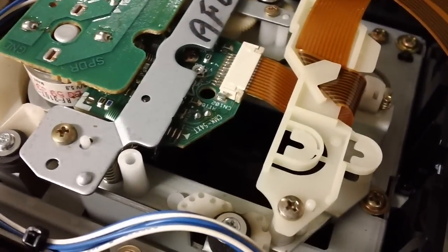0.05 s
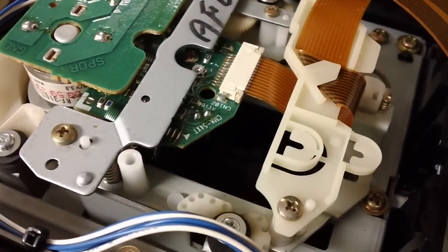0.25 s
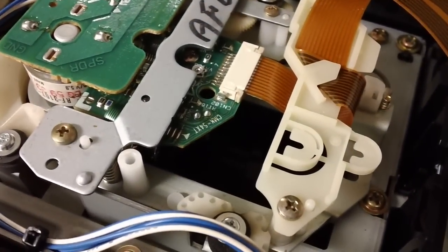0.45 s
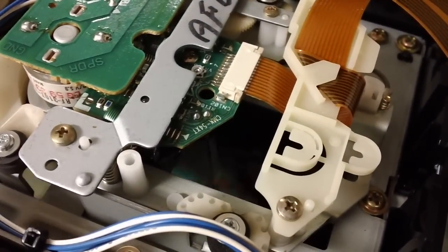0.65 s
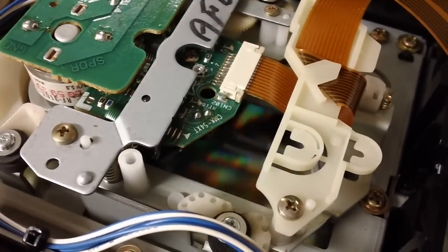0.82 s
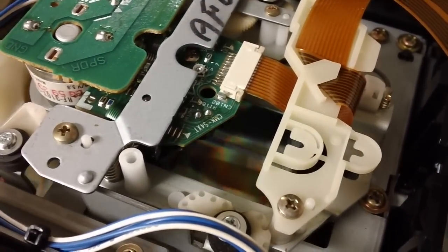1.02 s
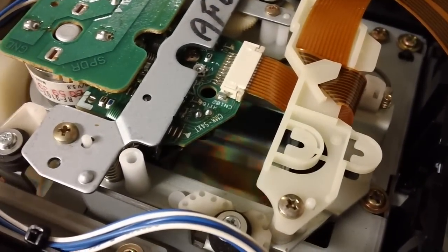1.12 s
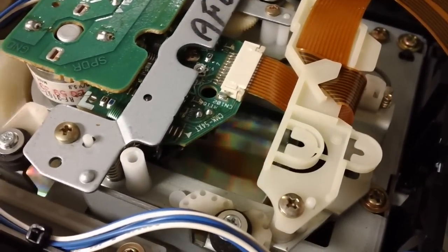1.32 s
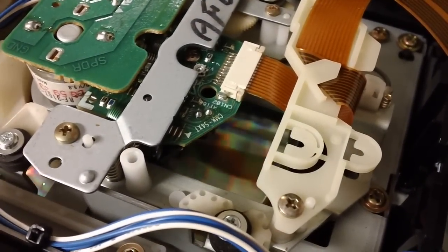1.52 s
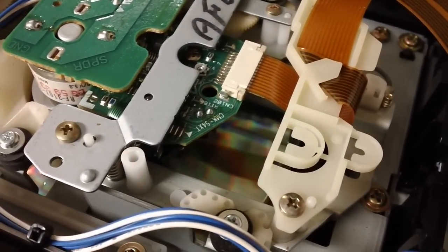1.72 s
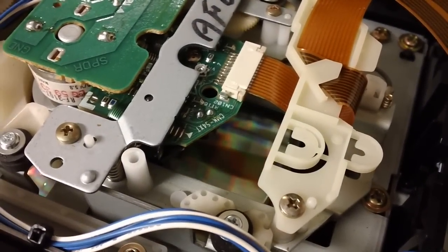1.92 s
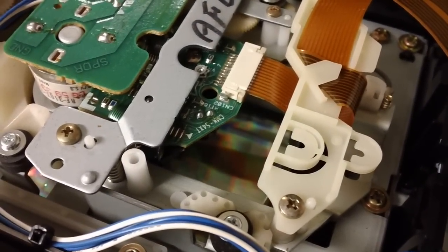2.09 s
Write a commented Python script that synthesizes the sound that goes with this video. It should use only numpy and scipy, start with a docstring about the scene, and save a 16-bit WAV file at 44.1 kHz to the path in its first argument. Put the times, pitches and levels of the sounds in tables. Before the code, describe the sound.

A disc changer mechanism clacks and rattles in two quick bursts of plastic levers and latches while a small geared motor whirs. The motor stops and a last latch snaps, heard close up in a quiet room.

```python
"""A disc changer's plastic cams, levers and latches clack and bounce, close by in a quiet room.
Each contact is a sharp blow and a dying chatter that ring the chassis, the levers and metal parts.
A small motor drives them: its brushes tick six times a turn in the treble, its gears rumble in the
chassis. The motor stops, a last latch snaps, and low room noise with a few dull bumps remains."""
import sys
import numpy as np
from scipy import signal
from scipy.fft import rfft, irfft
from scipy.io import wavfile
from scipy.ndimage import uniform_filter1d

SR = 44100
rng = np.random.default_rng(int(sys.argv[2]) if len(sys.argv) > 2 else 0)


def wav_out(sig):
    """Save sig, one row per channel (or a flat mono array), as 16-bit PCM at SR to the path in sys.argv[1]."""
    wavfile.write(sys.argv[1], SR, np.round(np.clip(np.atleast_2d(sig).T, -1, 1) * 32767).astype(np.int16))


N = 94815


def undb(db):
    return 10 ** (np.asarray(db) / 20)


def unit(x):
    return x / np.sqrt(np.mean(x ** 2))


def ring(x, modes):
    """Parallel resonances (pitch_hz, width_hz, level_db) that keep the power of white noise."""
    def bank(drive):
        return sum((-1) ** k * undb(db) * signal.lfilter(*signal.iirpeak(hz, hz / width, fs=SR), drive)
                   for k, (hz, width, db) in enumerate(modes))
    impulse = np.arange(1024) == 0
    return bank(x) / np.sqrt(np.sum(bank(impulse) ** 2))


def coloured(spectrum):
    """Noise of unit power, shaped by a spectrum (pitch_hz, level_db)."""
    hz, db = np.array(spectrum).T
    bins_hz = np.arange(N // 2 + 1) * SR / N + 1
    gain = undb(np.interp(np.log(bins_hz), np.log(hz), db))
    return unit(irfft(rfft(rng.standard_normal(N)) * gain, N))


def flicker(rate_hz):
    """Glides between random values, with a spread of 1."""
    hold = int(SR / rate_hz)
    steps = np.repeat(rng.standard_normal(N // hold + 1), hold)
    return unit(uniform_filter1d(steps, hold)[:N])


def curve(points, column):
    """One column as an envelope over the times in the first."""
    points = np.array(points)
    return np.interp(np.arange(N) / SR, points[:, 0], points[:, column])


def room():
    """Low room tone that swells towards the end, with a few dull bumps."""
    # room tone spectrum: pitch_hz, level_db
    spectrum = [(15, -38.5), (25, -16.5), (114, -4), (236, -1), (293, -3), (503, -7.5), (545, -6),
                (962, -10), (1070, -12.5), (14800, -30), (16000, -39.5)]
    # dull bumps: start_s, pitch_hz, length_s, level_db
    bumps = [(0.31, 165, 0.056, -41.5), (1.341, 88, 0.027, -39), (1.932, 290, 0.028, -48.5),
             (1.993, 215, .03, -49), (2.06, 298, .045, -42.5)]
    t = np.arange(N) / SR
    thuds = sum(undb(db) * np.sin(2 * np.pi * hz * t) * np.sin(np.pi * np.clip((t - s) / length, 0, 1))
                for s, hz, length, db in bumps)
    swell_db = 8.5 * np.maximum(t - 1.72, 0)
    return coloured(spectrum) * undb(-54 + swell_db) + thuds


def gears():
    """Gears grind into the chassis: a ringing rumble whose level flickers by about 1 dB."""
    # rumble spectrum: pitch_hz, level_db
    spectrum = [(59, -32), (100, -5.5), (323, -0.5), (393, -9), (504, -3), (815, -6), (1390, -11),
                (1520, -7.5), (2090, -11), (2880, -12), (7000, -23.5), (9100, -35.5), (15400, -120)]
    # gear resonances: pitch_hz, width_hz, level_db
    modes = [(738, 154, -6.5), (1412, 13, -7), (2330, 47, -9.5), (3597, 130, -9)]
    rumble = coloured(spectrum) + undb(-4.5) * ring(rng.standard_normal(N), modes)
    return unit(rumble * undb(flicker(rate_hz=61.31)))


def brushes():
    """Brushes tick and scrape over each commutator segment and rub steadily; the bearing hisses."""
    # shaft rotation: time_s, turns
    shaft = [(0, -.4), (.0593, 2), (.1058, 4), (.308, 13), (.403, 17), (.587, 24), (.7337, 30), (.8559, 35),
             (.9757, 40), (1.0939, 45), (1.2089, 50), (1.5301, 64)]
    # tick of each segment: level_db
    segment_db = [0, -11, -5, -7.5, -11, -8]
    # resonances of tick, rub and bearing: pitch_hz, width_hz, level_db
    tick_modes = [(8650, 700, -1), (9820, 650, 0), (10700, 650, 0), (11900, 1000, -6), (14900, 900, -7)]
    rub_modes = [(7350, 350, 0), (7800, 250, 0), (8650, 500, 0), (9780, 400, 0), (10700, 400, 0),
                 (11500, 800, -11)]
    bearing_modes = [(13500, 1200, -1), (15100, 900, -1.5)]
    segment = np.floor(curve(shaft, 1) * len(segment_db)).astype(int)
    edges = np.flatnonzero(np.diff(segment)) + 1
    scatter_db = rng.standard_normal(N)[edges]
    ticks = np.zeros(N)
    ticks[edges] = undb(np.array(segment_db)[segment[edges] % len(segment_db)] + scatter_db)
    scrape = signal.lfilter([1], [1, -.95], ticks) * rng.standard_normal(N)
    contact = unit(ticks) + undb(-8) * unit(scrape)
    ticking = unit(ring(ring(contact, tick_modes), tick_modes))
    rub = ring(rng.standard_normal(N), rub_modes)
    hiss = ring(rng.standard_normal(N), bearing_modes)
    return unit(ticking + rub) + undb(-15) * hiss


def motor(stop_s=1.527, brush_t60_s=0.088, gear_t60_s=0.23):
    """Brushes and gears follow the load, then die away when the current stops."""
    # levels under load: time_s, brushes_db, gears_db
    load = [(0.0, -45.5, -42.5), (0.126, -36.5, -42.5), (0.282, -38.5, -40.5), (0.402, -44.5, -42),
            (0.524, -49.5, -42), (0.8, -46.5, -48.5), (0.952, -43.5, -46), (1.058, -42.5, -43),
            (1.248, -41, -45.5), (1.404, -49.5, -48.5), (1.442, -49.5, -54.5), (1.52, -48.5, -50.5)]
    stopped_s = np.maximum(np.arange(N) / SR - stop_s, 0)
    brush_gain = undb(curve(load, 1) - 60 * stopped_s / brush_t60_s)
    gear_gain = undb(curve(load, 2) - 60 * stopped_s / gear_t60_s)
    return brushes() * brush_gain + gears() * gear_gain


def clacks(rise_s=0.00014, chatter_db=5, ping_trim_db=-21, ping_t60_share=0.45):
    """Each contact is a blow and a dying chatter: it rings four parts and one ping of its own."""
    # cam and latch contacts: start_s, ping_db (before trim), ping_hz, chassis_db, chassis_hz,
    # low_lever_db, high_lever_db, metal_db, base_t60_s
    contacts = [(0.023, -13.5, 1720, -38, 730, -45, -48, -70, 0.055),
                (0.092, -9.5, 1700, -47, 673, -48, -47, -45, 0.023),
                (0.1365, 2, 6390, -63, 692, -66, -52, -35, 0.011),
                (0.184, -28, 3800, -37, 720, -41, -38, -60, 0.1),
                (0.22, -2, 2260, -30, 1146, -49, -52, -57, 0.03),
                (0.2256, 11.5, 3830, -36.5, 550, -28, -27, -31, 0.029),
                (0.234, -0.5, 3290, -29.5, 740, -27.5, -30, -42, 0.07),
                (0.239, -1, 2200, -66, 686, -40.5, -53, -39, 0.027),
                (0.269, 4.5, 6290, -41, 730, -35, -35, -27, 0.038),
                (0.312, -12, 4350, -34, 755, -31, -36, -32, 0.093),
                (0.374, -22, 2500, -47, 899, -46, -62, -47.5, 0.037),
                (0.4097, 2, 2580, -25.5, 820, -24, -28, -31.5, 0.029),
                (0.413, 7, 1840, -21, 850, -32.5, -45, -53, 0.051),
                (0.445, -3.5, 1950, -26, 850, -34, -53, -56, 0.085),
                (0.465, 16.5, 2146, -16.5, 890, -17.5, -17.5, -19.5, 0.043),
                (0.48, -5, 2870, -23.5, 590, -44, -32.5, -31.5, 0.13),
                (0.487, -3, 2600, -24, 840, -35, -47, -46, 0.14),
                (0.495, -11, 1960, -23.5, 1090, -23.5, -27.5, -28, 0.07),
                (0.498, -6, 4230, -38, 700, -30, -24, -21, 0.043),
                (0.503, 3, 2290, -22.5, 695, -39, -32, -31.5, 0.1),
                (0.53, -7, 2350, -38, 638, -33, -32, -33.5, 0.076),
                (0.554, 0, 4660, -38, 694, -28.5, -31, -26, 0.048),
                (0.57, 1, 2330, -20, 887, -24, -25.5, -31.5, 0.078),
                (0.588, -2, 2040, -28.5, 778, -63, -63, -48, 0.075),
                (0.685, -29, 2750, -35, 810, -44, -44, -43.5, 0.23),
                (0.719, -31, 1950, -44, 503, -42.5, -48, -46, 0.088),
                (0.764, -29, 2070, -37.5, 800, -54, -48, -44.5, 0.42),
                (0.865, -21, 2880, -39.5, 730, -42, -46.5, -51, 0.12),
                (0.885, -25, 1620, -33.5, 860, -47, -45.5, -58, 0.064),
                (0.9, -18, 1550, -52, 950, -47, -52, -48, 0.066),
                (0.95, -26, 2250, -45, 522, -49, -64, -50, 0.041),
                (1.015, -5, 5790, -58, 710, -43, -43, -43, 0.035),
                (1.029, -14.5, 3500, -41.5, 715, -48, -45.5, -55, 0.077),
                (1.066, -36, 1870, -42, 770, -48, -54, -53.5, 0.071),
                (1.079, -31, 2190, -42.5, 926, -46, -49.5, -52, 0.15),
                (1.115, -15.5, 2330, -44.5, 660, -48.5, -48, -55.5, 0.083),
                (1.147, -34.5, 2260, -45.5, 640, -45, -48, -53.5, 0.053),
                (1.154, -8, 2270, -41.5, 980, -32.5, -40, -45, 0.078),
                (1.161, -10.5, 2040, -35, 626, -35.5, -36.5, -40.5, 0.072),
                (1.239, -2, 5940, -27.5, 1120, -20.5, -20.5, -26.5, 0.12),
                (1.244, 6.5, 5150, -29, 640, -42.5, -18.5, -15.5, 0.082),
                (1.252, 7, 1220, -18.5, 770, -33.5, -40, -37, 0.013),
                (1.26, 7, 1240, -15.5, 900, -31, -29, -46.5, 0.041),
                (1.267, 4.5, 2070, -16, 730, -31.5, -33, -32.5, 0.029),
                (1.299, -22, 2270, -48, 813, -34, -40, -45, 0.048),
                (1.317, -3, 1930, -59, 697, -42, -34, -43, 0.055),
                (1.326, 12, 1760, -17.5, 800, -19.5, -24, -31.5, 0.044),
                (1.335, 4, 1660, -32.5, 880, -26.5, -22, -31.5, 0.062),
                (1.343, 2, 2560, -16.5, 740, -44, -47, -32, 0.054),
                (1.363, -15, 4100, -29, 646, -42, -33.5, -37, 0.031),
                (1.388, -14, 2380, -56, 541, -45, -51, -44, 0.074),
                (1.398, 6.5, 6240, -60, 540, -38, -30, -22.5, 0.04),
                (1.401, -3.5, 2490, -44, 600, -41, -32, -30, 0.047),
                (1.554, 4.5, 3730, -34, 910, -39.5, -35.5, -35.5, 0.031),
                (1.572, -3, 3760, -38.5, 890, -46.5, -55, -49, 0.037),
                (1.584, -26.5, 3820, -43, 860, -68, -46, -60.5, 0.04)]
    # resonances of the case under the chassis, the levers and the metal: pitch_hz, width_hz, level_db
    case = [(305, 170, -19.5), (150.6, 50, -29)]
    low_levers = [(1329, 235, 0), (1644, 160, 1.5), (1952, 340, 1), (2282, 310, 2.5), (2554, 354, 1),
                  (2870, 119, -1)]
    high_levers = [(3110, 460, -1), (3834, 720, 1), (4447, 1110, 0.5), (5235, 300, -2)]
    metal = [(5760, 750, 5.5), (7700, 2400, 2), (10180, 890, 6), (11400, 2300, -3), (14700, 1330, -3)]
    # first touch over the chatter, for chassis, low levers, high levers, metal: level_db
    blow_db = [21.1, 17.3, 18, 14]
    # how much faster the chatter dies in the same four parts: ratio
    decay_ratios = [1.01, 1.05, 1.15, 1.7]
    length = 6000
    out, t = np.zeros(N + length), np.arange(length) / SR
    for start_s, ping_db, ping_hz, chassis_db, chassis_hz, low_db, high_db, metal_db, t60 in contacts:
        fade = undb(-60 * t / t60) * (1 - np.exp(-t / rise_s))
        chatter = undb(chatter_db * np.repeat(rng.standard_normal(100), 60))
        force = fade ** np.array(decay_ratios)[:, None] * chatter * rng.standard_normal((4, length))
        force[:, 4] += undb(blow_db)
        chassis = [(chassis_hz, 102, 0), (0.676 * chassis_hz, 102, -10), (1.3 * chassis_hz, 200, -10)]
        parts = [unit(ring(force[0], chassis + case)),
                 unit(ring(ring(force[1], low_levers), low_levers)),  # twice, for steeper skirts
                 unit(ring(ring(force[2], high_levers), high_levers)),
                 unit(ring(force[3], metal))]
        # levels count as if the whole ring were packed into 10 ms
        clack = undb([chassis_db, low_db, high_db, metal_db]) @ parts * np.sqrt(.01 / t[-1])
        ping_gain = undb(ping_db + ping_trim_db - 60 * t / (ping_t60_share * t60))
        start = int(start_s * SR)
        out[start:start + length] += clack + ping_gain * np.sin(2 * np.pi * ping_hz * t)
    return signal.sosfilt(signal.butter(2, 110, "high", fs=SR, output="sos"), out[:N])


def scene(tail_t60_s=0.25, tail_db=-14):
    """The close mechanism with a short reverb tail, over the room tone."""
    mechanism = clacks() + motor()
    t = np.arange(SR // 4) / SR
    tail = rng.standard_normal(len(t)) * undb(-60 * t / tail_t60_s)
    reverb = signal.fftconvolve(mechanism, tail / np.sqrt(np.sum(tail ** 2)))[:N]
    return (mechanism + undb(tail_db) * reverb + room())[None]


def record(dry, ceiling=1.3, notch_hz=12550, notch_width_hz=1500):
    """The microphone rounds the loudest peaks, notches the treble and drops steeply above that."""
    rounded = ceiling * np.tanh(dry / ceiling)
    notched = signal.lfilter(*signal.iirnotch(notch_hz, notch_hz / notch_width_hz, fs=SR), rounded)
    rolled_off = signal.sosfilt(signal.ellip(8, .5, 40, 15270, fs=SR, output="sos"), notched)
    return signal.sosfilt(signal.ellip(12, .2, 90, 16500, fs=SR, output="sos"), rolled_off)


dry = scene()
out = record(dry)
wav_out(out)
```